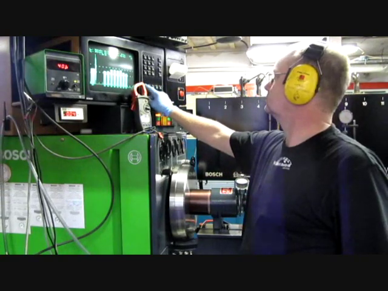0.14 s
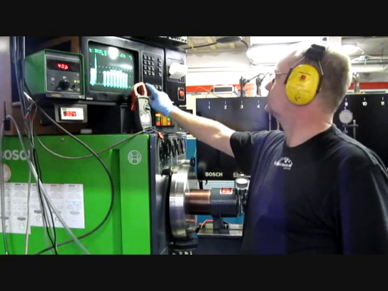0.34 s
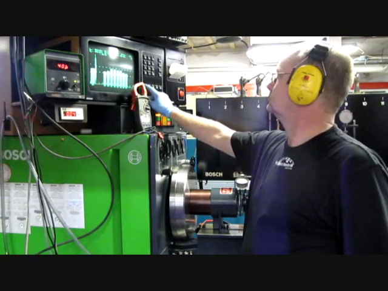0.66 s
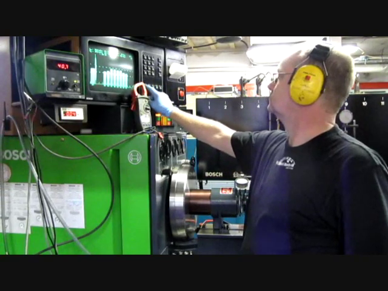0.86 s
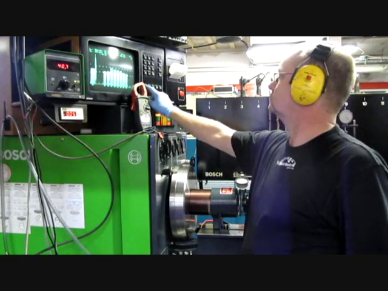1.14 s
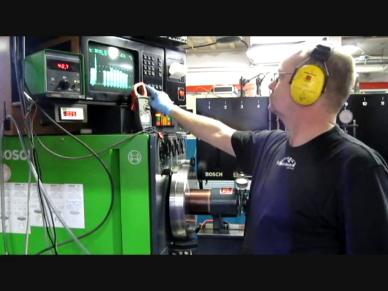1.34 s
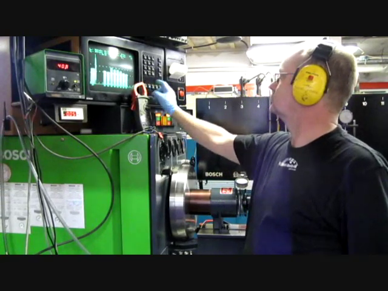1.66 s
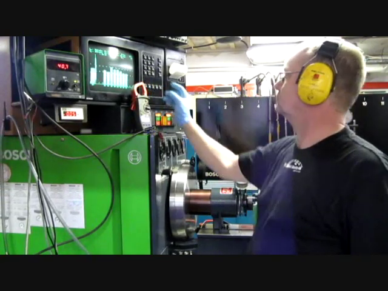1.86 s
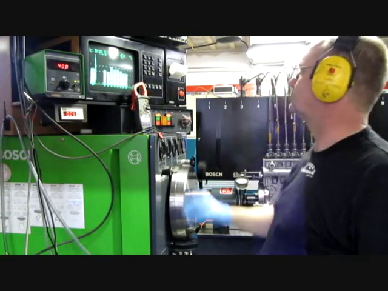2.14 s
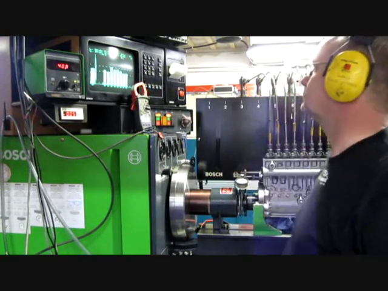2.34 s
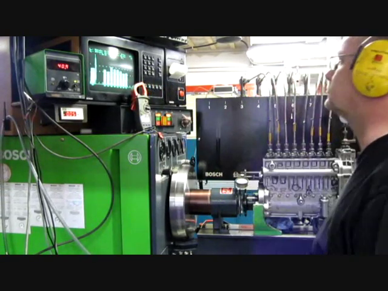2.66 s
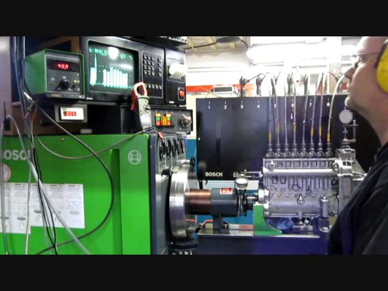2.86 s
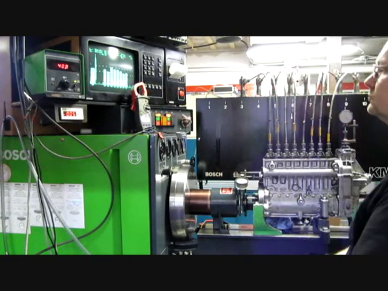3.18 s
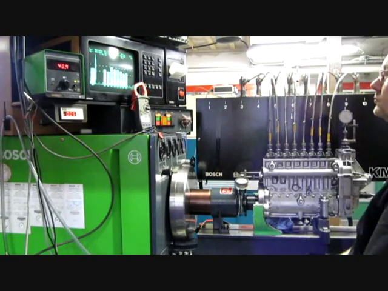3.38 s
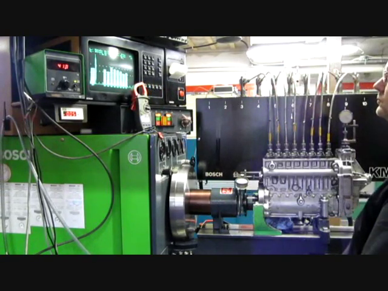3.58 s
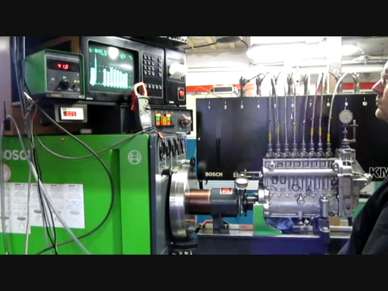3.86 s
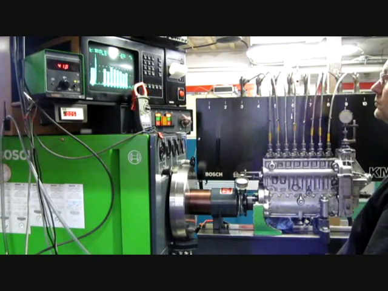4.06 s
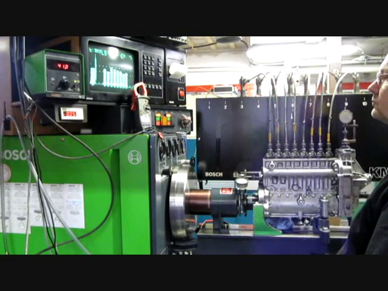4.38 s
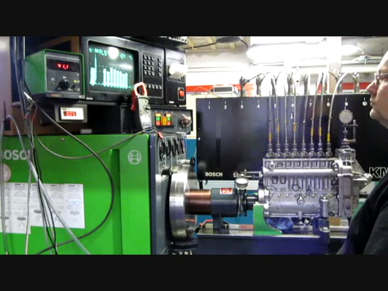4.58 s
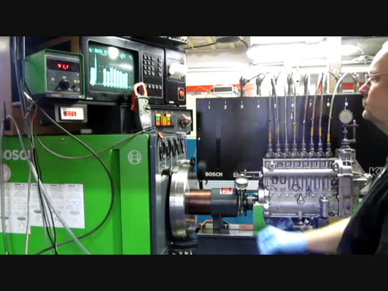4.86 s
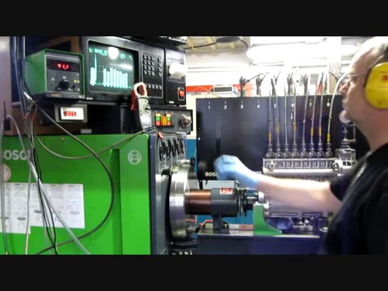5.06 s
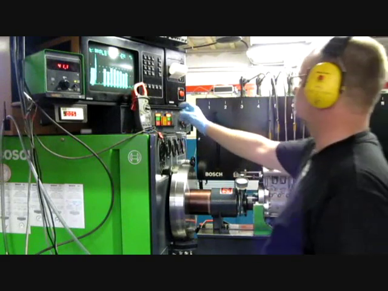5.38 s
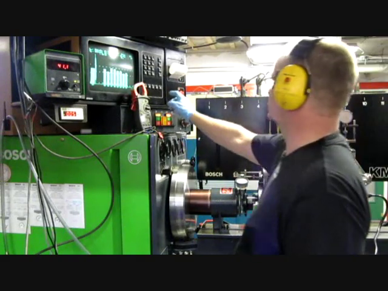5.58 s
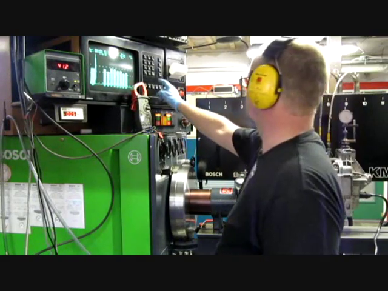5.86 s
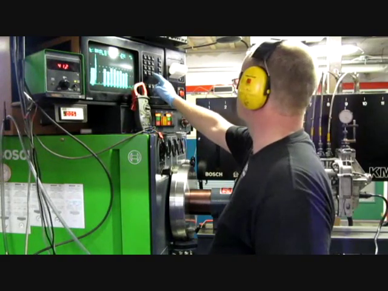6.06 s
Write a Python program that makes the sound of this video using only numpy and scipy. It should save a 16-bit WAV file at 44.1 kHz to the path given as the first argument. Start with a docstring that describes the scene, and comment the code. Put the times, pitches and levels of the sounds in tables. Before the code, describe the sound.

A loud mechanical pump whines and clatters at steady speed on a workshop test bench, throbbing rapidly, with oil hiss and high metallic ticking.

```python
"""Diesel injection pump on a test bench

An eight-plunger pump turns at about 950 rpm in a workshop. Its knocks repeat every turn: sines at the
shaft's orders make a loud, throbbing whine and clatter. Shaped noise gives oil hiss, needle ticks and rumble.
The operator steps aside and back before the microphone, which shifts the weight between the partials.
A feed pump and bench motor drone behind as steady sines."""
import sys
import numpy as np
from scipy.fft import rfft, irfft, next_fast_len
from scipy.io import wavfile
from scipy.ndimage import map_coordinates

SR = 44100
rng = np.random.default_rng(int(sys.argv[2]) if len(sys.argv) > 2 else 0)


def to_wav(sig):
    """Store sig (one row per channel, or 1-D mono) as 16-bit WAV at the path in sys.argv[1].

    Samples outside -1..1 are clipped; the rate is SR.
    """
    pcm = np.clip(np.atleast_2d(sig), -1, 1) * 32767
    pcm = np.round(pcm).astype(np.int16)
    wavfile.write(sys.argv[1], SR, pcm.T)  # frames by channels


N = 274302

SHAFT_HZ = 15.8455  # mean turns per second
PLUNGERS = 8

# the whine, one row per harmonic of the injection rate from the first up, before waver and shadows:
# [rms level with the operator in front/dB, rms level with him aside/dB]
WHINE_LEVELS = [(-49.5, -49), (-51.5, -49.5), (-31.5, -32), (-36, -37), (-27, -31.5), (-29, -25),
                (-33.5, -30), (-27, -27), (-24.5, -27.5), (-25.5, -21.5), (-46, -35.5), (-45, -27.5),
                (-39.5, -33.5), (-40.5, -36.5), (-34, -45), (-33.5, -36.5), (-44, -38.5), (-36, -33),
                (-43.5, -46), (-40, -41.5), (-42, -36)]


def amp(db):
    """Gain of a level in dB."""
    return np.exp(np.asarray(db) * np.log(10) / 20)


def unit(x):
    """x scaled to an rms of 1."""
    return x / np.sqrt(np.mean(x ** 2) + 1e-20)


def along(points, hz):
    """Value at hz between (f/Hz, value) points, on a log frequency axis."""
    f, value = np.transpose(points)
    return np.interp(np.log(hz + 1), np.log(f), value)


def curves(rows):
    """One value per sample for each column after the time."""
    s, *columns = np.transpose(rows)
    t = np.arange(N) / SR
    return [np.interp(t, s, column) for column in columns]


def wobble(rate, size=64):
    """A smooth random curve with rate knots a second, worked out every size samples."""
    coarse = np.arange(0, N + size, size)
    knots = rng.standard_normal(int(N * rate / SR) + 4)
    curve = map_coordinates(knots, [coarse * rate / SR])
    return np.interp(np.arange(N), coarse, curve)


def filtered(x, response):
    """x with its spectrum multiplied by a response of frequency."""
    m = next_fast_len(N + SR // 2)  # room for the ringing to run out
    spectrum = rfft(x, m) * response(np.fft.rfftfreq(m, 1 / SR))
    return irfft(spectrum, m)[:N]


def noise(spectrum):
    """Coloured noise of rms 1."""
    return unit(filtered(rng.standard_normal(N), lambda hz: amp(along(spectrum, hz))))


def shaft():
    """Turns of the camshaft; the speed governor hunts very slightly."""
    t = np.arange(N) / SR
    hunting_hz = .006 * np.sin(2 * np.pi * 1.35 * t) + .003 * wobble(5)
    return np.cumsum(SHAFT_HZ + hunting_hz) / SR


def one_turn(heavy_db, heavy_at, unlike, ring_s, size=8192):
    """Order spectrum of one turn: eight alike knocks, each a little its own, heavier on one side of the cam."""
    t = np.arange(size) / size / SHAFT_HZ

    def ring():
        return rng.standard_normal(size) * np.exp(-t / ring_s)

    common = ring()
    turn = np.zeros(size)
    for angle in np.arange(PLUNGERS) / PLUNGERS:  # in turns
        weight = amp(heavy_db * np.cos(2 * np.pi * angle))
        knock = weight * (common + unlike * ring())
        turn += np.roll(knock, int(size * (heavy_at + angle)))
    return rfft(turn)


def order_timing(throb_lo_hz=980, throb_hi_hz=1800):
    """Phase of each shaft order; the bench's middle resonances swell once a turn, the rest knock evenly."""
    even = one_turn(heavy_db=0, heavy_at=.3, unlike=.6, ring_s=.004)
    throbbing = one_turn(heavy_db=6, heavy_at=.28, unlike=.2, ring_s=.0025)
    hz = np.arange(len(even)) * SHAFT_HZ
    in_band = (hz > throb_lo_hz) & (hz < throb_hi_hz)
    return np.angle(np.where(in_band, throbbing, even))


def housing_db(hz):
    """How far the resonances of housing and bench lift each frequency, as flat-topped bumps in dB."""
    # resonances of pump housing and bench: [centre f/Hz, width at half the lift/Hz, lift/dB]
    resonances = [(315, 38, 5.5), (393, 43, 9.5), (595, 26, 5.5), (860, 66, 3), (1124, 12, 5),
                  (1380, 47, -0.5), (1560, 37, -1.5), (1680, 52, -2), (1980, 90, -2), (2300, 27, 0.5),
                  (2340, 53, 4), (2780, 79, 2.5), (3510, 160, 4), (3817, 100, 3.5)]
    return sum(db / (1 + (2 * (hz - centre) / width) ** 4) for centre, width, db in resonances)


def whine(turns, aside, harmonics, phase, waver_db=0.34, stir_db=.8):
    """Injection-rate harmonics glide between their front and aside levels, less steady in between."""
    # dips and swells as the operator walks past and leans back in:
    # [t/s, fade/s, centre f/Hz, width/Hz, depth/dB (below 0 it swells)]
    shadows = [(2.15, 0.14, 820, 225, 3.5), (2.45, .45, 380, 120, -2.5), (2.5, .3, 1140, 120, 7),
               (2.9, 0.53, 1270, 100, 3.5), (3.15, .15, 1020, 100, -4), (5.65, .2, 1260, 200, 5),
               (5.7, 0.37, 760, 110, 16), (5.95, 0.43, 647, 150, 5.5), (5.9, .3, 1650, 120, -9)]
    t = np.arange(N) / SR
    s, fade, centre_hz, width_hz, depth_db = np.transpose(shadows)
    passing = np.exp(-((t - s[:, None]) / fade[:, None]) ** 2)  # each shadow is a bell in time and in pitch
    unsteady_db = waver_db + stir_db * np.sin(np.pi * aside)
    tone = np.zeros(N)
    for k, (front_db, aside_db) in zip(harmonics, WHINE_LEVELS):
        shade_db = depth_db * np.exp(-(2 * (k * SHAFT_HZ - centre_hz) / width_hz) ** 2)
        stance_db = front_db + aside * (aside_db - front_db)
        db = stance_db - shade_db @ passing + unsteady_db * wobble(10)
        tone += np.sqrt(2) * amp(db) * np.cos(2 * np.pi * k * turns + phase[k])
    return tone


def pump(turns, aside, level_db, injection_db=6.5, scatter_db=3.0, shadow_db=3.5):
    """The knocks time every shaft order; the housing and the path to the microphone set its strength."""
    # sidebands of the uneven plungers that stand out, before the clatter's overall level:
    # [shaft order, rms level with the operator in front/dB, rms level with him aside/dB]
    sidebands = [(14, -55, -60), (35, -37, -39), (47, -33, -33), (49, -40, -38), (55, -37, -37),
                 (57, -34, -34), (69, -35, -37), (70, -36, -36), (71, -37, -39), (74, -37, -40),
                 (81, -38, -35), (94, -35, -37), (95, -34, -35), (97, -33, -37), (98, -29, -32),
                 (99, -37, -38), (105, -33, -34), (109, -39, -34)]
    # remaining shaft orders, before housing, scatter and overall level: [f/Hz, rms level of each/dB]
    clatter_levels = [(40, -72), (80, -81), (150, -64.5), (195, -71), (260, -57), (480, -51.5),
                      (700, -51.5), (820, -42), (970, -54.5), (1250, -56), (1420, -44.5), (1620, -45),
                      (1900, -48), (2200, -48.5), (3600, -49.5), (4600, -53), (6500, -62), (12000, -78)]
    # scatter of the orders' timing by echoes: [operator in front/(rad/kHz), aside/(rad/kHz)]
    echo_smear = (.27, .65)
    phase = order_timing()
    order = np.arange(len(phase))
    hz = order * SHAFT_HZ
    harmonics = PLUNGERS * np.arange(1, len(WHINE_LEVELS) + 1)

    def spread():
        return np.clip(rng.standard_normal(len(order)), -2, 1)

    order_db = along(clatter_levels, hz) + housing_db(hz) + scatter_db * spread()
    order_db = order_db + injection_db * (order % PLUNGERS == 0)  # here the knocks add in step
    khz = np.minimum(hz / 1000, 2)  # the scatter grows no further above 2 kHz
    named, *stances = np.transpose(sidebands)
    clatter = np.zeros(N)
    for named_db, smear, share in zip(stances, echo_smear, (1 - aside, aside)):
        gain = amp(order_db + shadow_db * spread())  # his body shades each order differently
        gain[np.round(named).astype(int)] = amp(named_db)
        gain[0] = gain[harmonics] = 0  # the whine carries the harmonics
        arrival = phase + smear * khz * rng.standard_normal(len(order))  # short waves scatter most
        cycle = irfft(gain * np.exp(1j * arrival)) * np.sqrt(2) * len(order)
        clatter += share * map_coordinates(cycle, [turns % 1 * len(cycle)], mode="grid-wrap")
    return whine(turns, aside, harmonics, phase) + amp(level_db - 0.61) * clatter


def spray(turns, pulse_db=2.0, flutter_db=0.67):
    """Oil hisses through lines and nozzles, swelling at each injection and ringing the housing."""
    # oil spray and rattle that never repeat, before the housing: [f/Hz, relative level per Hz/dB]
    oil_spectrum = [(100, -35), (195, -28), (270, -11), (500, -17.5), (850, 0), (1650, 6), (2200, -1),
                    (3700, -3), (5300, -2), (7000, -7.5), (8700, -11), (10300, -13.5), (11300, -17.5),
                    (12500, -23)]
    swell_db = pulse_db * np.cos(2 * np.pi * PLUNGERS * turns) + flutter_db * wobble(60)
    hiss = amp(swell_db) * noise(oil_spectrum)
    return amp(-23.5) * unit(filtered(hiss, lambda hz: amp(housing_db(hz))))


def needles(turns, ring_hz=9550, width_hz=340, fade_db=12, uneven_db=2):
    """Each nozzle needle snaps shut with a thin, high tick of its own strength: fading noise rings steel."""
    beat = turns * PLUNGERS
    size_db = uneven_db * rng.standard_normal(PLUNGERS)[beat.astype(int) % PLUNGERS]
    ticks = rng.standard_normal(N) * amp(size_db - fade_db * (beat % 1))  # fade_db per beat

    def steel(hz):
        damping = 1j * hz * width_hz
        return damping / (ring_hz ** 2 - hz ** 2 + damping)

    return amp(-40) * unit(filtered(ticks, steel))


def feed_pump(waver_db=2.2, drift=0.65):
    """Steady gear and motor tones, unrelated to the camshaft, wavering in level and phase (drift in rad)."""
    # feed pump and bench motor, before the waver: [f/Hz, rms level/dB]
    steady_tones = [(297.4, -52), (375.5, -45), (545.1, -43), (594.2, -49), (817.6, -35.5), (1023.5, -47),
                    (1090.1, -37), (2180.2, -47)]
    t = np.arange(N) / SR
    drone = np.zeros(N)
    for hz, db in steady_tones:
        level = np.sqrt(2) * amp(db + waver_db * wobble(2.2))
        angle = 2 * np.pi * (hz * t + rng.random()) + drift * wobble(4.28)
        drone += level * np.sin(angle)
    return drone


def rumble():
    """The workshop's low rumble: steady noise, mostly bass."""
    # workshop background: [f/Hz, relative level per Hz/dB]
    room_spectrum = [(20, -18), (33, -9), (44, 5), (62, -8), (110, 6), (165, -2), (195, -23), (500, -23),
                     (2000, -70)]
    return amp(-55.5) * noise(room_spectrum)


def scene():
    """Pump, nozzles and feed pump over the workshop's rumble."""
    # the operator's place and the overall level: [t/s, place (0 in front of the pump .. 1 aside), # level of
    # clatter and hiss before each one's own trim/dB: a brief swell, a sudden drop, then nearly steady]
    stance = [(0, 0.11, 0.5), (1.95, 0, 0.5), (2.25, 0.63, 1), (2.45, 0.69, 2), (2.53, 0.85, 0.1),
              (3, 1, -0.37), (4, 1, -0.3), (5.15, 1, -0.6), (5.55, 0.12, 0.5), (6.22, 0.12, 0.2)]
    turns = shaft()
    aside, level_db = curves(stance)
    aside = np.clip(aside, 0, 1)
    nozzle_gain = amp(level_db + 1.54 * aside + 0.1)  # a body screens the treble most
    nozzles = nozzle_gain * (spray(turns) + needles(turns))
    bench = pump(turns, aside, level_db) + nozzles + feed_pump()
    return (bench + rumble())[None]


def record(dry, top_hz=12560):
    """The microphone's recorder keeps nothing above its band limit."""
    return filtered(dry[0], lambda hz: hz < top_hz)[None]


dry = scene()
out = record(dry)
to_wav(out)
```